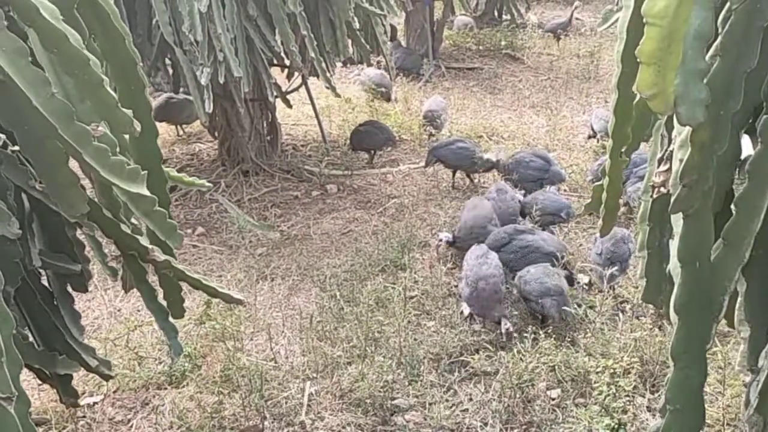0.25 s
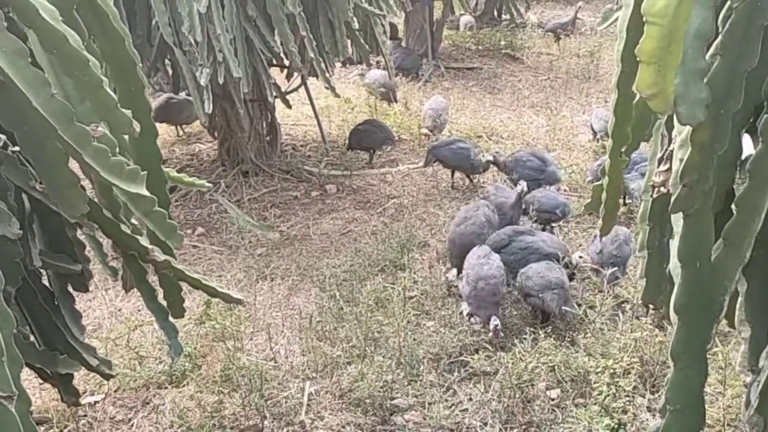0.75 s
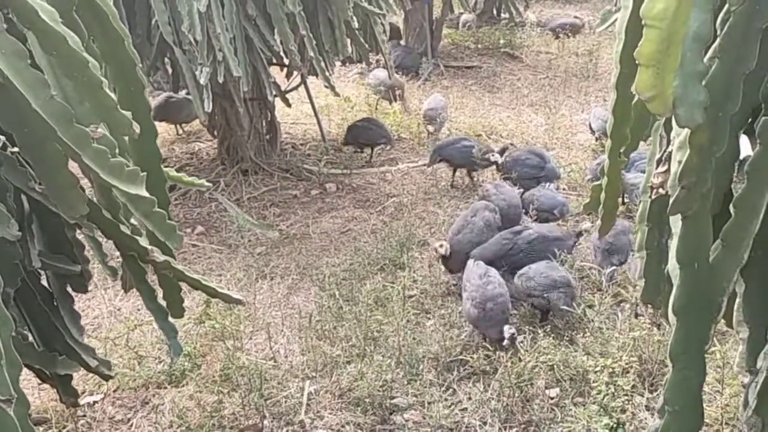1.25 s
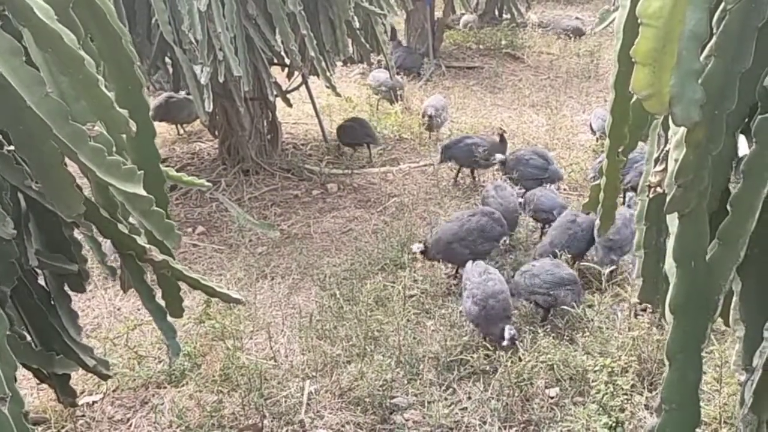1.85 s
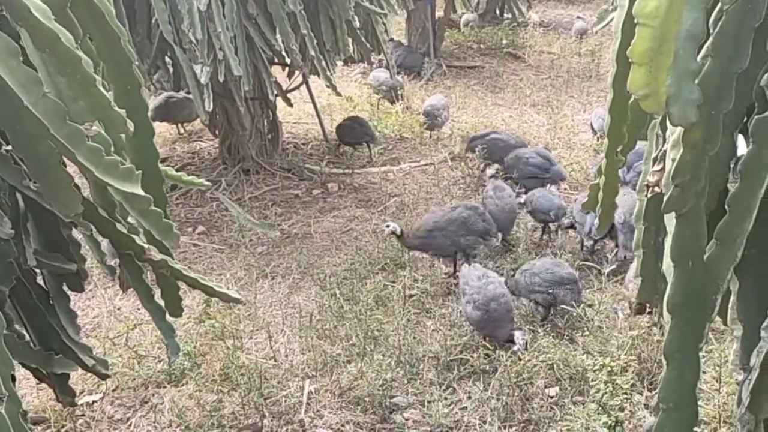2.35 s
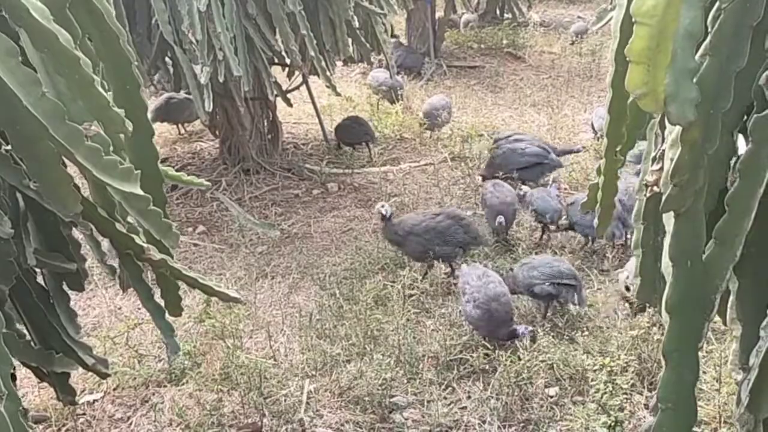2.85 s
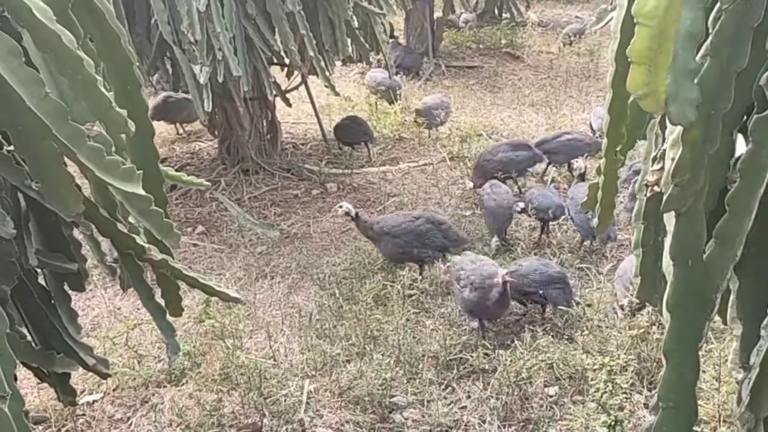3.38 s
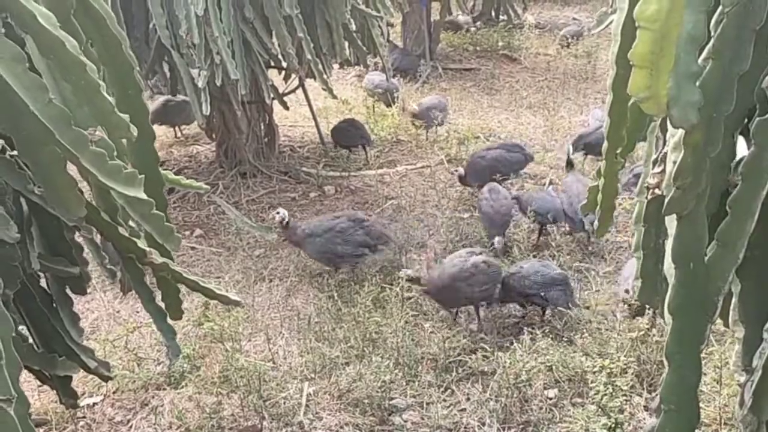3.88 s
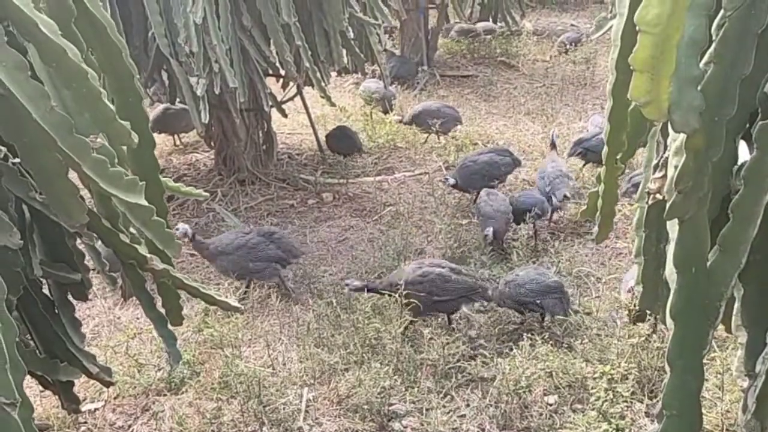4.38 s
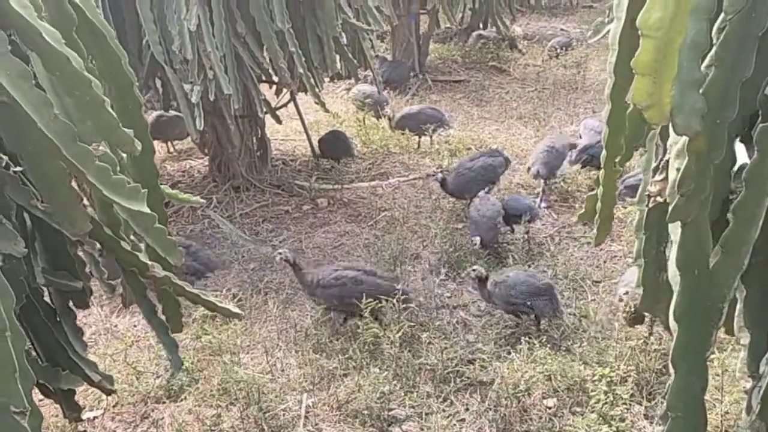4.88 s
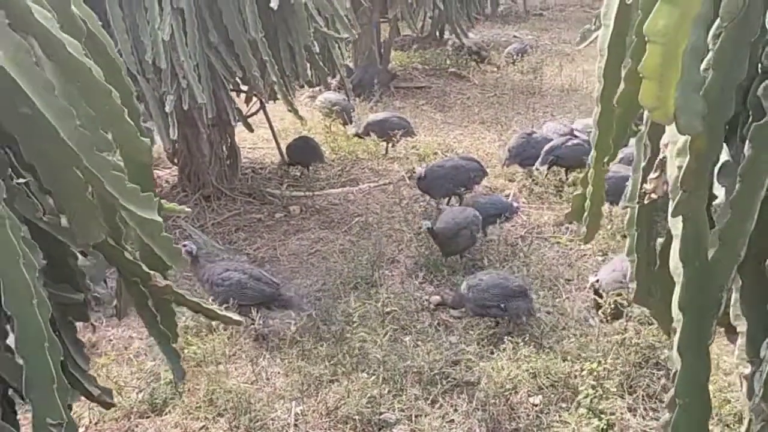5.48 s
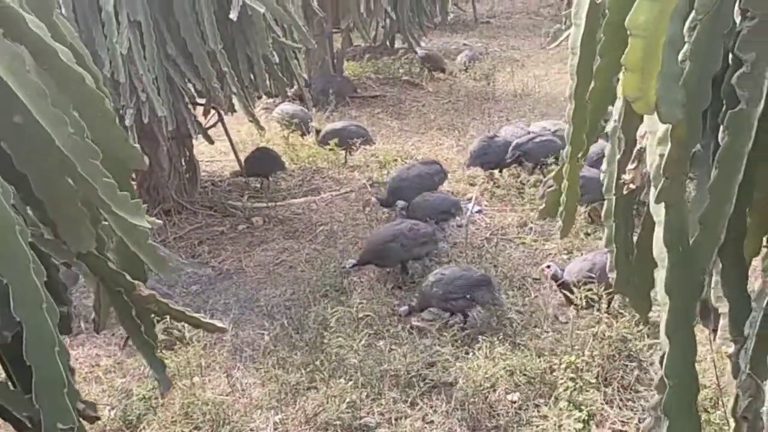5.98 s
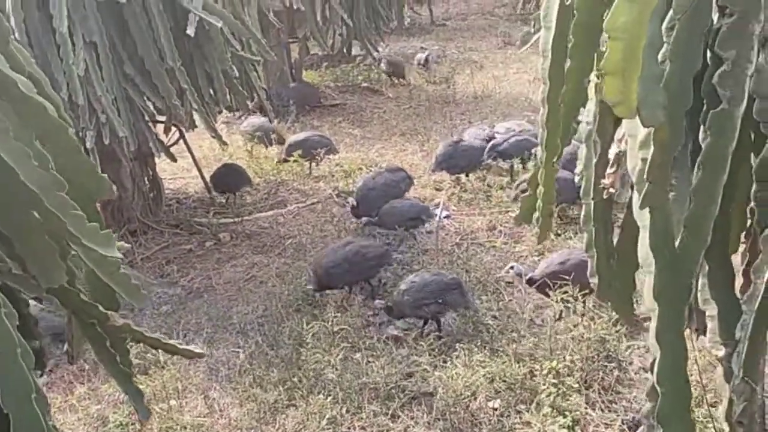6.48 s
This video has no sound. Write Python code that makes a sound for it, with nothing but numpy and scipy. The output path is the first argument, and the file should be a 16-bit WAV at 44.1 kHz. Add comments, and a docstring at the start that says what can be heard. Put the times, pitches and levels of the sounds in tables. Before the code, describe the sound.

A foraging guineafowl flock calls continuously: very short, raspy, bright clucks around one kilohertz, many each second, irregular and overlapping. Thin sliding peeps and low soft murmurs slip in between. More birds chatter faintly behind. Small dry ticks of pecking and light grass rustles sit underneath. A phone a few metres away hears it outdoors, slightly to the right, with short diffuse echoes from trunks and stems and very quiet air.

```python
"""In an orchard, a flock of guineafowl forages in front of a phone.
Each call is a short note near 1 kHz, made raspy by a slower second membrane, coloured by throat and beak.
Sliding sine peeps and low murmurs come between; ticks, rustle and thuds are short or swelling filtered noise.
Further birds chatter over a noise blur, trunks and stems return echoes, and faint air noise lies below."""
import sys
import numpy as np
from scipy import signal
from scipy.fft import rfft, irfft, next_fast_len
from scipy.io import wavfile
from scipy.ndimage import map_coordinates

SR = 44100
rng = np.random.default_rng(int(sys.argv[2]) if len(sys.argv) > 2 else 0)


def dump_mix(stems):
    """Bounce the given channels to the path in sys.argv[1] as a 16-bit WAV at rate SR."""
    frames = np.atleast_2d(stems).T  # one column per channel
    limited = np.clip(frames, -1, 1)  # hard clip at full scale
    pcm = np.round(limited * 32767).astype(np.int16)
    wavfile.write(sys.argv[1], SR, pcm)


N = 297234
USUAL_PITCH_HZ = 1005


def undb(db):
    """Amplitude factor of a level in dB."""
    return 10 ** (np.asarray(db) / 20)


def unit(x):
    """Scale to rms 1."""
    return x / np.sqrt(np.mean(x ** 2) + 1e-20)


def freqs(x):
    """Frequency of each spectral bin in Hz, at least 1."""
    return np.maximum(np.fft.rfftfreq(x.shape[-1], 1 / SR), 1)


def resonate(x, hz, width_hz, order=2):
    """Cascade of equal resonances; width_hz is that of one stage."""
    f = freqs(x)
    stage = 1 + 1j * (f / hz - hz / f) * hz / width_hz
    return irfft(rfft(x) / stage ** order, len(x))


def colour(x, points):
    """Shape the spectrum by (Hz, dB) points, joined over log frequency."""
    hz, db = np.transpose(points)
    gain = undb(np.interp(np.log(freqs(x)), np.log(hz), db))
    return irfft(rfft(x) * gain, x.shape[-1])


def wander(n, rate_hz):
    """Smooth random curve of spread near 1, with rate_hz random knots a second."""
    at = np.arange(n) * rate_hz / SR
    knots = rng.standard_normal(int(at[-1]) + 3)
    return map_coordinates(knots, [at], order=2, mode="nearest")


def add(out, x, start_s):
    """Mix a stereo sound in at its time."""
    i = max(int(start_s * SR), 0)
    out[:, i:i + x.shape[1]] += x[:, :max(N - i, 0)]


def place(x, pan_db, scatter_db=-8, scatter_s=.005, count=5):
    """Direction sets level and delay between channels; ground and stems add a few early echoes to each."""
    x = np.pad(x, (0, next_fast_len(len(x) + 2048) - len(x)))
    lag_s = np.interp(pan_db, [-5.5, -3, -1], [.00044, .00016, .00004])
    lag_s = lag_s + .00004 * rng.standard_normal()
    right = irfft(rfft(x) * np.exp(-2j * np.pi * freqs(x) * lag_s), len(x))
    pair = np.array([x, right])
    echoes = np.zeros_like(pair)
    for channel in echoes:
        late_s = np.minimum(.0004 + rng.exponential(scatter_s, count), .03)
        channel[(late_s * SR).astype(int)] = rng.choice([-1, 1], count) / np.sqrt(count)
    # thin stems scatter the short waves most
    echoes = colour(echoes, [(300, -3), (1000, 4.5), (3500, 3.5), (8000, 7)])
    pair = pair + undb(scatter_db) * irfft(rfft(x) * rfft(echoes), len(x))
    pair *= np.linalg.norm(x) / np.linalg.norm(pair, axis=1, keepdims=True)
    return pair * unit(undb(np.array([[pan_db], [-pan_db]]) / 2))


def air(level_db=-59.5, shared=0.68, sway_hz=4.37):
    """Faint outdoor rumble and hiss, partly shared by both channels, its level wandering."""
    # Each row: frequency in Hz, relative level in dB.
    air_points = [(20, -3), (50, -3), (100, -13), (200, -11), (1000, -15), (8000, -31), (12000, -43),
                  (16000, -36)]
    noise = rng.standard_normal((2, N)) + shared * rng.standard_normal(N)
    return undb(level_db) * unit(colour(noise, air_points)) * undb(wander(N, sway_hz))


def grove(x, wet_db=-14, t60_s=0.23, first_s=0.00067):
    """Trunks and cactus stems return a short diffuse tail, thin in the bass."""
    t = np.arange(int(.7 * SR)) / SR
    onset = 1 - np.exp(-(t / first_s) ** 2)
    tail = rng.standard_normal((2, len(t))) * undb(-60 * t / t60_s) * onset
    tail = tail / np.linalg.norm(tail, axis=1, keepdims=True)
    tail = colour(tail, [(300, -3), (1000, -5), (3200, 7), (5000, 5.5), (9000, 7)])
    return undb(wet_db) * signal.fftconvolve(x, tail, axes=1)[:, :N]


def trunks(x, echo_db=-16, late_s=(.021, .027)):
    """The nearest trunks throw back one distinct echo to each channel; the bass passes round them."""
    echo = np.array([np.pad(channel, (int(s * SR), 0))[:N] for channel, s in zip(x, late_s)])
    return undb(echo_db) * colour(echo, [(300, -17), (900, -1.5), (4000, 0.5)])


def far_birds(count=170, calls_db=-2, blur_db=-13):
    """Many further birds call at random, over a noise blur for their echoes among the trees."""
    # Each row: time in seconds, chatter level in dB ahead of calls_db and blur_db.
    chatter_rows = [(0, -33.5), (.38, -43.5), (.54, -33.5), (.7, -40.5), (1.07, -37.5), (1.6, -41),
                    (1.92, -38.5), (2.47, -41.5), (2.75, -35), (3.08, -42), (3.49, -34.5), (4.05, -43.5),
                    (4.47, -33), (4.75, -37.5), (5.0, -37), (5.54, -32.5), (5.97, -37), (6.74, -38.5)]
    # Each row: frequency in Hz, relative level of the blur in dB.
    blur_points = [(120, -54), (200, -25), (332, -5.5), (485, -7.5), (748, -39), (980, -6.5), (1200, -4),
                   (1980, -7), (2380, -6.5), (2950, -9.5), (3940, 0), (5970, -13.5), (8120, -63),
                   (11600, -37), (15000, -39)]
    out = np.zeros((2, N))
    draws = rng.random((count, 9))
    for k, (when, long, pitch, glide, arch, rasp, beak, loud, side) in enumerate(draws):
        hz, db = 930 + 380 * pitch, 7 * loud
        call = squawk(0.0223 + 0.031 * long, 0.41, hz, (.78 + 0.2374 * glide) * hz, 0.15 * arch,
                      0.3 + 0.5 * rasp, 2900 + 900 * beak, 2280, db, db - 7.5, db - 10.5, db - 19.5)
        add(out, place(call, 1 - 8 * side, scatter_db=-1), (k + when) / count * N / SR)
    blur = unit(colour(rng.standard_normal((2, N)), blur_points)) * undb(3 * wander(N, 18))
    level = undb(np.interp(np.arange(N) / SR, *np.transpose(chatter_rows)))
    return level * (undb(calls_db) * unit(out) + undb(blur_db) * blur)


def thuds(hz=110, width_hz=110, decay_s=0.0073, gain_db=-2):
    """Dull, soft bumps on the ground: decaying noise through a low resonance."""
    # Each row: start in seconds, level in dB ahead of gain_db.
    thud_rows = [(3.519, -63.5), (3.779, -59), (5.863, -62)]
    out, t = np.zeros((2, N)), np.arange(4096) / SR
    for start_s, db in thud_rows:
        bump = resonate(rng.standard_normal(len(t)) * np.exp(-t / decay_s), hz, width_hz)
        add(out, place(undb(db + gain_db) * unit(bump), 0), start_s)
    return out


def rustle(gain_db=-1, grain_db=4):
    """Feet shuffle and dry blades brush past the legs: a thin, grainy hiss that comes step by step."""
    # Each row: start in seconds, length in seconds, level in dB ahead of gain_db.
    shuffle_rows = [(0.703, 0.23, -48), (0.91, 0.2, -48.5), (1.16, 0.13, -48.5), (1.7, 0.2, -58),
                    (2.32, 0.15, -49), (2.6, 0.15, -67), (3.273, 0.21, -52), (4.35, .07, -47),
                    (4.677, 0.24, -59), (5.55, .35, -58), (6.078, .26, -54), (6.42, 0.24, -56)]
    blades = rng.standard_normal((2, N)) * undb(grain_db * wander(N, 500) + 2 * wander(N, 30))
    hiss = unit(colour(blades, [(1000, -3), (5000, 11.5), (9000, -12), (12000, -4), (16000, -16)]))
    t = np.arange(N) / SR
    steps = np.zeros(N)
    for start_s, length_s, db in shuffle_rows:
        steps += undb(db) * np.sin(np.pi * np.clip((t - start_s) / length_s, 0, 1))
    return undb(gain_db) * hiss * steps


def pecks(gain_db=-1, decay_s=0.0015, count=50, faint_db=-60):
    """Pecks and snapping stalks: dry noise ticks, a few clear ones and many faint ones."""
    # Each row: start in seconds, peak in dB ahead of gain_db and placing.
    peck_rows = [(.918, -34.5), (1.189, -40), (2.134, -42), (2.187, -26), (2.319, -33.5), (2.449, -36),
                 (2.694, -36), (3.246, -38), (3.273, -37.5), (4.06, -40), (4.375, -34), (5.2, -37),
                 (6.647, -32)]
    tick_points = [(300, -12), (1000, 4), (4500, -3), (8000, -11), (12000, -10), (16000, -19)]
    out, t = np.zeros((2, N)), np.arange(1024) / SR
    faint = [(when * N / SR, faint_db + 10 * size) for when, size in rng.random((count, 2))]
    for start_s, db in list(peck_rows) + faint:
        burst = rng.standard_normal(len(t)) * np.sqrt(t) * np.exp(-t / decay_s)
        tick = colour(burst, tick_points)
        tick = undb(db + gain_db) * tick / np.abs(tick).max()
        add(out, place(tick, -0.41, scatter_db=-4), start_s)
    return out


def murmurs(gain_db=-2, overtone_db=-11, quiver=0.064, sag=0.042):
    """The slow membrane alone through a closed beak; the pitch quivers and sinks by the share sag."""
    # Each row: start in seconds, length in seconds, mean pitch in Hz, level in dB ahead of gain_db.
    murmur_rows = [(0.176, 0.06, 288, -57), (0.578, 0.15, 351, -55), (0.84, 0.06, 370, -55.5),
                   (1.084, 0.11, 332, -55), (1.249, 0.078, 319, -55), (1.416, 0.14, 344.6, -48),
                   (2.206, 0.041, 324, -42), (2.406, 0.037, 303, -44.5), (2.461, 0.11, 229, -62),
                   (2.989, 0.048, 325, -50), (3.108, 0.072, 313, -45), (3.414, 0.11, 349.5, -50),
                   (3.623, 0.088, 235, -57.5), (3.842, 0.068, 630, -51.5), (3.99, 0.087, 258, -56.5),
                   (4.176, 0.086, 833, -47.5), (5.441, 0.13, 332.4, -50), (5.554, 0.23, 353, -49),
                   (5.768, 0.12, 323.5, -51), (6.089, 0.092, 188, -57), (6.348, 0.11, 199, -57.5),
                   (6.67, 0.068, 293.5, -49.5)]
    out = np.zeros((2, N))
    for start_s, length_s, hz, db in murmur_rows:
        u = np.linspace(0, 1, int(length_s * SR))
        pitch_hz = hz * (1 + sag * (.5 - u)) * (1 + quiver * wander(len(u), 125.4))
        phase = 2 * np.pi * np.cumsum(pitch_hz) / SR
        note = np.sin(np.pi * u) * (np.sin(phase) + undb(overtone_db) * np.sin(2 * phase))
        add(out, place(undb(db + gain_db) * unit(note), -0.7, scatter_db=-38), start_s)
    return out


def peeps(gain_db=1, overtone_db=-32):
    """Thin sliding whistles: nearly pure sines with a slightly unsteady pitch."""
    # Each row: start in seconds, length in seconds, first and last pitch in Hz,
    # level in dB ahead of gain_db, left minus right in dB.
    peep_rows = [(.052, .026, 3290, 2500, -34, 2), (0.079, 0.017, 2493, 1888, -30.5, 3),
                 (0.119, 0.04, 3586, 2646, -37.5, -4), (1.594, 0.017, 3250, 2440, -40.5, -3),
                 (1.649, 0.059, 3570, 2865, -38, -8.5), (2.206, 0.024, 2900, 3670, -25, -5),
                 (2.269, .08, 3620, 3200, -44, -16), (2.334, 0.031, 4100, 3000, -32, -5),
                 (3.702, 0.07, 3090, 2930, -48, -11), (4.243, .042, 3640, 2805, -33.5, -8),
                 (4.536, 0.017, 3100, 2230, -33.5, 3), (4.567, 0.048, 3450, 2585, -30, -9),
                 (4.616, 0.019, 3330, 2510, -40, -8), (5.485, 0.026, 2500, 2342, -35.5, -4.5),
                 (5.584, 0.017, 2950, 4000, -32, -2.5), (5.615, 0.024, 3500, 2770, -29, -4),
                 (6.052, 0.052, 2800, 3250, -35, -3.5), (6.325, 0.0089, 4490, 2900, -26, 1)]
    out = np.zeros((2, N))
    for start_s, length_s, hz0, hz1, db, pan_db in peep_rows:
        u = np.linspace(0, 1, int(length_s * SR))
        pitch_hz = hz0 * (hz1 / hz0) ** u * (1 + .007 * wander(len(u), 250))
        phase = 2 * np.pi * np.cumsum(pitch_hz) / SR
        swell = np.sqrt(u * (1 - u)) * (u + .5) * undb(1.2 * wander(len(u), 100))
        note = swell * (np.sin(phase) + undb(overtone_db) * np.sin(2 * phase))
        add(out, place(undb(db + gain_db) * unit(note), pan_db, scatter_db=-17), start_s)
    return out


def squawk(length_s, peak, hz0, hz1, arch, rasp, beak_hz, beak_width_hz,
           beak_db, throat_db, root_db, low_db):
    """One call: a 1 kHz membrane, chopped into pulses by a slower one as the rasp grows."""
    slow_hz = 323.8  # the slow membrane locks to the whole fraction of the pitch near this rate
    onset_sharp, settle_s = 0.063, 0.0039
    usual_edge_db, usual_hiss_db, usual_effort_db, hiss_db_per_db = -46, -67, -35.5, 1.09
    n = next_fast_len(int((length_s + 0.0099) * SR))
    t = np.arange(n) / SR
    u, rasp = np.clip(t / (1.08 * length_s), 0, 1), np.clip(rasp, 0, 1)

    # air pressure starts abruptly, swells to its peak and is cut off; pitch arches with it
    swell = np.interp(u, [0, np.clip(peak, .1, .9), 1], [0, 1, 0])
    hump = np.abs(np.sin(np.pi * u)) * (u < 1)
    body = hump ** (.25 + .25 * rasp)
    push = body * np.exp(1.1 * swell)
    mean_hz = (hz0 + hz1) / 2
    hz = (hz0 + (hz1 - hz0) * u) * (1 + arch * (hump - 2 / np.pi))
    hz = hz * (1 + onset_sharp * np.exp(-t / settle_s))
    jitter = .016 * rasp * wander(n, 150) + (.007 + .055 * rasp ** 2) * wander(n, 800)
    phase = 2 * np.pi * np.cumsum(hz * (1 + jitter)) / SR

    # the slow membrane stresses every third or fourth pulse; the harshest calls rattle
    slow = phase / np.round(mean_hz / slow_hz) + .55 * wander(n, 170)
    chop = np.exp(1.8 * rasp ** 1.4 * np.cos(slow) + .25 * rasp * wander(n, 300))
    # the wave shape is unsteady, so every harmonic flickers
    pulses = np.zeros(n)
    for k in range(1, 14):
        pulses += undb(2.4 * wander(n, 90)) * np.cos(k * phase + 1.1 * rng.standard_normal())
    breath = (.05 + .55 * rasp ** 1.6) * rng.standard_normal(n)
    source = chop * (unit(pulses) + breath)

    # the beak opens with the swell, and its resonance rises
    bright = colour(source * push, [(1000, 9.5), (2000, 2.5), (2700, 2.5), (3300, -0.5),
                                    (4600, -2), (5800, 2), (7000, -8.5)])
    beak_open = resonate(bright * swell, beak_hz * 1.04, beak_width_hz, order=3)
    beak_shut = resonate(bright * (1 - swell), beak_hz * .92, beak_width_hz, order=3)
    beak = beak_open + beak_shut
    # effort lets out the thin upper edge of the voice, and a hiss above it
    effort_db = .3 * beak_db + .7 * throat_db - usual_effort_db
    edge = colour(source * body * (swell + 0.3),
                  [(3500, -67), (4900, 6), (5800, 12.5), (7000, -6.5), (9000, -33.5)])
    edge_db = usual_edge_db + effort_db - 25 * np.log10(hz0 / USUAL_PITCH_HZ)
    hiss = colour((source + 0.58 * rng.standard_normal(n)) * push,
                  [(5000, -28), (7500, 1.5), (9500, -7.5), (12000, 3), (15000, -9)])
    hiss_db = usual_hiss_db + hiss_db_per_db * effort_db
    # throat size varies from call to call
    throat_hz = 1647 * np.exp(0.099 * rng.standard_normal())
    throat = resonate(source * push, throat_hz, 790, order=3)
    # fundamental and low note swell and fade more gently than the overtones
    root = resonate(source * hump ** .8, mean_hz, 400 + 600 * rasp, order=3)
    low = hump * (np.sin(slow) + 0.35 * np.sin(2 * slow))
    parts = [(beak_db, beak), (edge_db, edge), (hiss_db, hiss),
             (throat_db, throat), (root_db, root), (low_db, low)]
    return sum(undb(db) * unit(part) for db, part in parts)


def near_birds(beak_gain_db=0, throat_gain_db=-2, root_gain_db=-1):
    """Calls of the birds in front: attack and low note follow the rasp, the pitch fall follows the bend."""
    # Each row: start in seconds, nominal length in seconds, mid pitch in Hz, upward bend as a share,
    # rasp 0-1, beak resonance in Hz, beak, throat and fundamental levels in dB ahead of the gains,
    # left minus right in dB.
    call_rows = [(0, 0.028, 936, -0.032, 0.6, 3600, -32.5, -42, -48.5, -3.5),
                 (0.086, 0.018, 975, 0.043, 0.12, 3720, -31, -32, -37, -2),
                 (0.139, 0.025, 956, 0.25, 0.44, 3100, -38, -41.5, -50.5, -3),
                 (0.23, 0.058, 983, 0.1, 0.28, 3900, -43, -40.5, -45.5, -3.5),
                 (0.313, 0.02, 921, 0.13, 0.48, 3560, -39.5, -54, -42.5, -4.5),
                 (0.393, 0.04, 1069, 0.054, 0.35, 3480, -55, -65, -44.5, -4.5),
                 (0.453, 0.035, 958, -0.032, 0.6, 3600, -27.5, -36.5, -43.5, -3),
                 (0.543, 0.032, 968, 0.0048, 0.34, 3180, -22.5, -32, -33, -2.5),
                 (0.612, 0.038, 1020, -0.039, 0.5, 3100, -21.5, -27.5, -29.5, 0.5),
                 (0.636, 0.029, 1055, -0.1, 0.9, 4280, -23.5, -31, -34.5, -3),
                 (0.711, 0.031, 955, 0.09, 0.6, 3320, -31, -40.5, -47, -2.5),
                 (0.833, 0.037, 1098, 0.086, 0.8, 3820, -38, -41.5, -59, -2),
                 (0.985, 0.037, 902, 0.13, 0.23, 3480, -36.5, -39.5, -37, -1.5),
                 (1.006, 0.046, 993, 0.081, 0.3, 3440, -37, -36, -35, -4.5),
                 (1.087, 0.019, 974, 0.027, 0.3, 3580, -24, -40.5, -37, -7),
                 (1.182, 0.028, 1030, 0.14, 0.2, 3600, -39, -46, -42, -6.5),
                 (1.26, 0.054, 1078, -0.0022, 0.31, 3800, -36.5, -46, -43.5, -6.5),
                 (1.298, 0.02, 989, 0.078, 0.1, 3420, -36.5, -37, -37, -6),
                 (1.381, 0.031, 993.4, -0.0038, 0.16, 3630, -21, -35.5, -31.5, -6),
                 (1.432, 0.14, 1023, -0.07, 0.98, 3500, -40.5, -48, -45.5, -2.5),
                 (1.528, 0.039, 946, -0.015, 0.94, 3630, -37, -47, -41.5, -2.5),
                 (1.59, .031, 884, -0.13, 0.6, 3060, -38.5, -44.5, -50.5, -3),
                 (1.703, .048, 924, 0.0078, 0.49, 3720, -33.5, -45.5, -44, -4.5),
                 (1.788, 0.018, 859, 0.1, 0.36, 3460, -40, -41.5, -43.5, -2.5),
                 (1.856, 0.019, 913, 0.12, 0.3, 3630, -31.5, -39, -45, -3),
                 (1.879, 0.016, 965, 0.15, .84, 3660, -30.5, -41, -55, -7),
                 (1.933, 0.042, 1098, -0.0055, 0.47, 3300, -31, -48, -46, -5.5),
                 (1.987, 0.054, 946, -0.0057, 0.06, 3680, -37.5, -35.5, -48, -1),
                 (2.053, 0.036, 922, 0.07, 0.46, 3470, -25.5, -38.5, -37.5, -10.5),
                 (2.172, 0.036, 1022, -0.017, 0.8, 3700, -46, -45, -42, -3.5),
                 (2.212, 0.036, 1176, -0.097, 0.81, 3580, -23.5, -30, -39, -4.5),
                 (2.325, 0.028, 999, 0.096, 0.45, 3500, -31, -42, -38.5, -5),
                 (2.348, 0.043, 924, 0.098, 0.33, 3460, -28, -37.5, -40, -2.5),
                 (2.398, 0.03, 1206, 0.095, 1, 3730, -38.5, -60, -37, -3.5),
                 (2.545, 0.031, 1035, -0.14, 0.32, 3350, -29, -34.5, -37, -4),
                 (2.595, 0.029, 1133, 0.098, 0.32, 3600, -31, -38.5, -40, -6),
                 (2.677, 0.024, 927, -0.016, 0.58, 3520, -34, -46, -53, -10),
                 (2.704, 0.023, 1077, 0.081, 0.61, 3320, -29.5, -51, -46, -5),
                 (2.735, 0.059, 1013, -0.026, 0.6, 3460, -35.5, -42, -45, -3.5),
                 (2.792, 0.041, 977, 0.22, 0.78, 3710, -35.5, -39.5, -42, -4.5),
                 (2.846, 0.058, 955, -0.035, 0, 3630, -43.5, -39.5, -35.5, -4),
                 (2.952, 0.032, 1137, -0.12, 0, 3920, -43, -50, -34.5, -20),
                 (2.993, 0.023, 992, 0.1, 0.44, 3610, -27, -47, -32.5, -3.5),
                 (3.088, 0.024, 1170, 0.2, 0.5, 3600, -34.5, -39, -35, -5),
                 (3.106, 0.046, 954, 0.087, 0.66, 3570, -23.5, -31.5, -34, -1.5),
                 (3.233, 0.029, 971, 0.0053, 0.63, 3330, -25, -37, -42, -5.5),
                 (3.303, 0.033, 915, 0.13, 0.32, 3520, -30.5, -35.5, -39, -2.5),
                 (3.398, 0.049, 1038, 0.14, 0.72, 3630, -37, -48, -39.5, -5),
                 (3.475, 0.031, 931, 0.0082, 0.52, 3440, -39, -58, -37.5, -2.5),
                 (3.551, 0.031, 1206, 0.17, 0.78, 3840, -27.5, -32.5, -38, -1.5),
                 (3.579, 0.037, 1213, -0.053, 1, 3560, -20.5, -40, -34, -2),
                 (3.623, 0.043, 960, 0.15, 0.36, 3300, -30.5, -47, -41.5, -3.5),
                 (3.752, 0.044, 1020, 0.11, 0.56, 3120, -33.5, -45, -35.5, -4),
                 (3.853, 0.042, 1006, 0.11, 0.48, 4190, -32.5, -45, -48, -5.5),
                 (3.968, 0.018, 1223, 0.25, 0.15, 3310, -56, -39, -45, -6),
                 (4.048, 0.034, 954, -0.083, 0.15, 3670, -36.5, -37, -40.5, -5),
                 (4.079, 0.031, 973, 0.16, 0, 3420, -32, -45, -39, -2.5),
                 (4.118, 0.027, 1219, 0.19, 0.67, 2980, -32.5, -47, -45, -5.5),
                 (4.288, 0.039, 972, -0.015, 0.33, 3600, -24.5, -32, -38, -2.5),
                 (4.416, 0.062, 912, 0.022, 0.56, 3330, -31, -36.5, -40.5, -1.5),
                 (4.47, 0.045, 981, -0.027, 0.14, 4260, -26.5, -32.5, -29.5, -1.5),
                 (4.539, 0.016, 994, 0.097, 0.14, 3260, -26, -32.5, -38, -2.5),
                 (4.593, 0.017, 937, 0.035, 0, 2970, -42, -56, -41, -22),
                 (4.634, 0.045, 869, -0.038, 0.56, 3860, -43, -42, -48.5, -3.5),
                 (4.712, 0.04, 982, -0.017, 0.41, 3660, -43, -45, -42, -4),
                 (4.815, 0.023, 970, 0.02, 0.4, 3680, -40.5, -42, -40, -3.5),
                 (4.882, 0.039, 980, 0.022, 0.71, 3500, -28, -33.5, -40, -4),
                 (4.931, .05, 1209, 0.047, 1, 3680, -27.5, -42, -36, -4.5),
                 (5.025, 0.048, 1083, 0.028, 0.92, 3250, -34.5, -43, -55, -2.5),
                 (5.174, 0.047, 1131, -0.014, 0.87, 3770, -33, -39, -40, -4.5),
                 (5.235, 0.027, 970, 0.074, 0, 3900, -47, -37.5, -41.5, -3.5),
                 (5.267, 0.057, 897, 0.11, 0.65, 3500, -32.5, -37.5, -42, -2),
                 (5.342, 0.02, 1165, -0.018, .05, 3850, -41, -46, -45, -4.5),
                 (5.386, 0.06, 987, 0.16, 0.57, 3740, -39, -54, -50, -4.5),
                 (5.485, 0.049, 1166, 0.024, 0.55, 3260, -27, -36.5, -36.5, -5.5),
                 (5.584, 0.055, 990, 0.21, 0.36, 3600, -26.5, -36, -33, -2.5),
                 (5.666, 0.03, 1216, 0.092, .31, 3640, -29.5, -33.5, -37, -3.5),
                 (5.689, 0.054, 926.5, -0.025, 0.65, 3640, -25, -35, -40.5, -2),
                 (5.74, .046, 1350, 0.03, 0.1, 3620, -39.5, -46, -37, -4.5),
                 (5.812, 0.03, 899, 0.078, 0.78, 3690, -53, -40, -42, -3),
                 (5.869, 0.049, 946, -0.034, 0.64, 3560, -29, -36.5, -39.5, -3),
                 (5.917, 0.044, 1000, 0.062, 0.53, 3680, -24, -31.5, -38.5, -3),
                 (5.952, 0.044, 963, -0.0074, 0.74, 3500, -28, -31.5, -37, -1.5),
                 (6.119, 0.059, 1019, 0.058, 0.97, 3500, -32, -37.5, -42.5, -2.5),
                 (6.181, 0.063, 949, -0.093, 0.86, 3280, -34, -40.5, -42.5, -4.5),
                 (6.26, 0.03, 1000, -0.13, 0.5, 3220, -35, -39.5, -39.5, -2),
                 (6.332, 0.017, 1080, 0.11, 0.5, 3600, -19.5, -31.5, -31, -5),
                 (6.363, 0.028, 895, 0.093, 0.81, 3140, -31.5, -39, -41.5, -3),
                 (6.416, 0.034, 1007, -0.018, 0.86, 3800, -43, -63, -43, -4),
                 (6.483, 0.054, 999, -0.093, 0.24, 3500, -44, -50, -46, -4.5),
                 (6.536, 0.023, 1138, 0.16, 0.88, 3510, -23, -30, -48, -2.5),
                 (6.659, 0.029, 991, -0.0084, 0.7, 3660, -35.5, -42, -46.5, -3.5),
                 (6.706, 0.024, 1170, 0.048, 0.9, 2930, -36.5, -52, -46, -2)]
    clean_peak, rasp_earlier = 0.54, 0.17  # shares of the call length
    plain_fall, fall_per_bend = 0.02, 0.48
    usual_width_hz, tightening = 1860, 0.72  # one beak stage; power of the pitch
    rasp_narrows = 0.18  # a rattling bird holds its beak tighter, so pulses ring longer
    usual_low_db, usual_root_db, low_follows, low_db_per_rasp = -60.5, -35, 0.41, 9.5
    out = np.zeros((2, N))
    for start_s, length_s, hz, bend, rasp, beak_hz, beak_db, throat_db, root_db, pan_db in call_rows:
        peak = clean_peak - rasp_earlier * rasp
        fall = plain_fall + fall_per_bend * bend
        width_hz = usual_width_hz * (USUAL_PITCH_HZ / hz) ** tightening / (1 + rasp_narrows * rasp ** 2)
        low_db = usual_low_db + low_follows * (root_db - usual_root_db) + low_db_per_rasp * rasp
        call = squawk(length_s, peak, hz * (1 + fall / 2), hz * (1 - fall / 2), bend, rasp,
                      beak_hz, width_hz, beak_db + beak_gain_db, throat_db + throat_gain_db,
                      root_db + root_gain_db, low_db)
        add(out, place(call, pan_db), start_s)
    return out


def scene():
    """The flock with its echoes, over the far birds, rustle, thuds and air."""
    flock = near_birds() + peeps() + murmurs() + pecks()
    return flock + trunks(flock) + grove(flock) + far_birds() + rustle() + thuds() + air()


def record(dry, top_hz=15750):
    """The phone cuts the top: a steep elliptic low-pass."""
    return signal.sosfilt(signal.ellip(10, .2, 70, top_hz, fs=SR, output="sos"), dry)


dry = scene()
out = record(dry)
dump_mix(out)
```